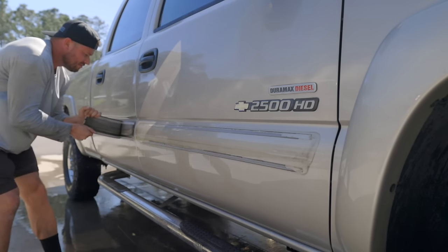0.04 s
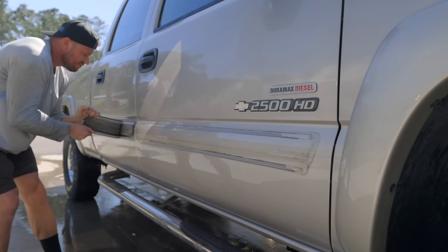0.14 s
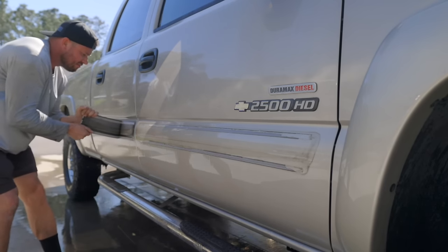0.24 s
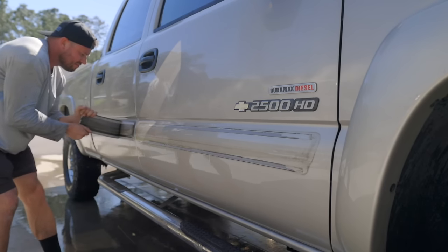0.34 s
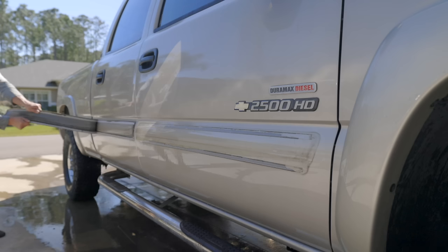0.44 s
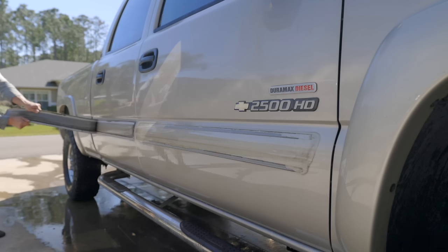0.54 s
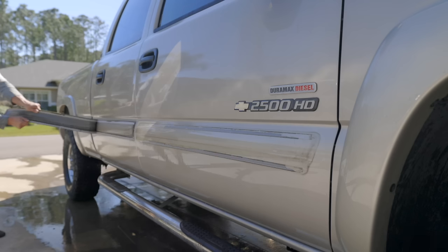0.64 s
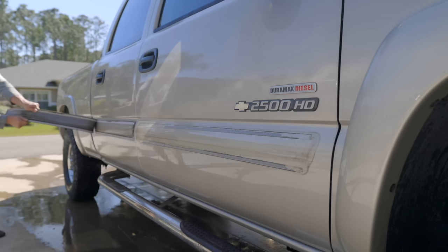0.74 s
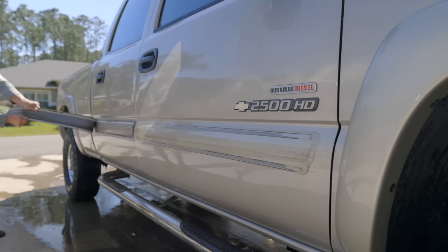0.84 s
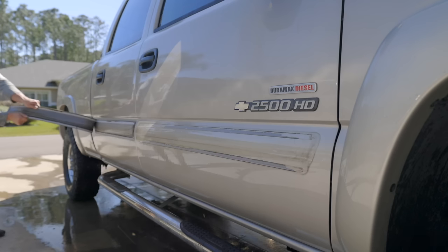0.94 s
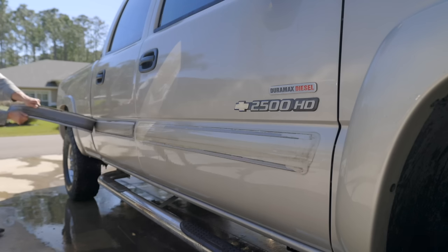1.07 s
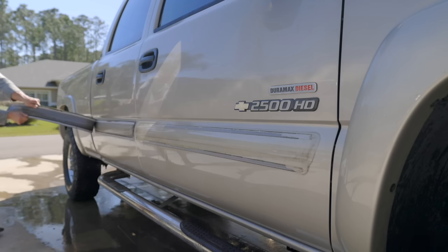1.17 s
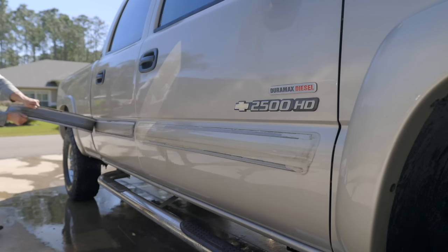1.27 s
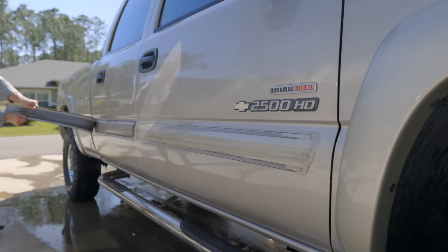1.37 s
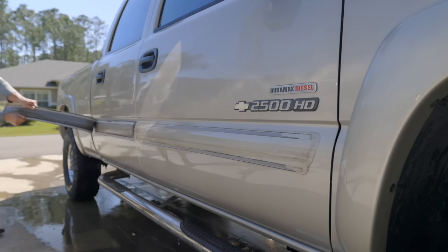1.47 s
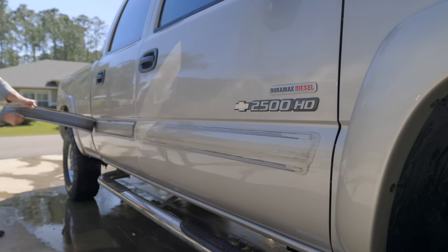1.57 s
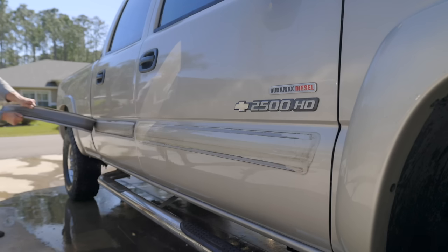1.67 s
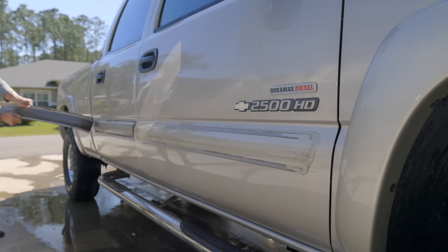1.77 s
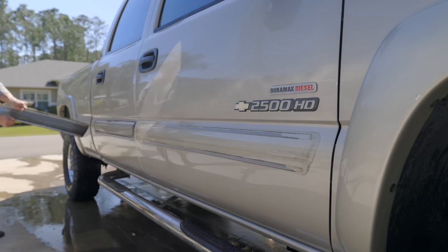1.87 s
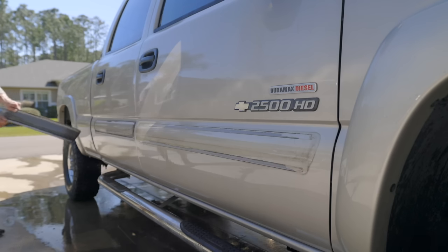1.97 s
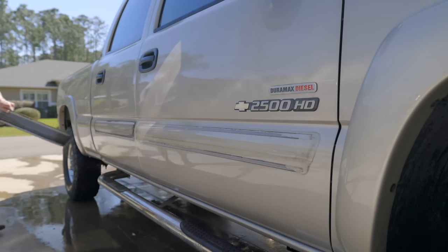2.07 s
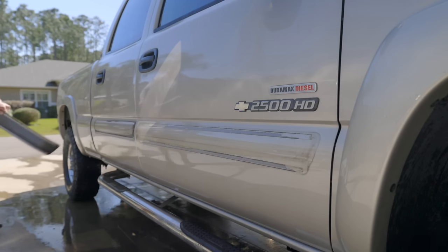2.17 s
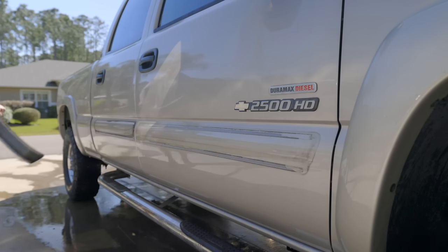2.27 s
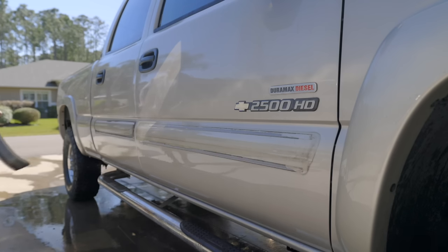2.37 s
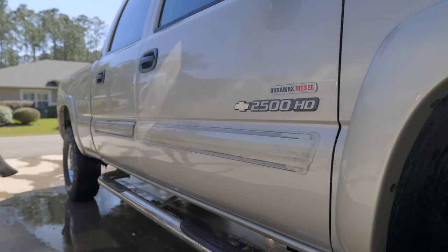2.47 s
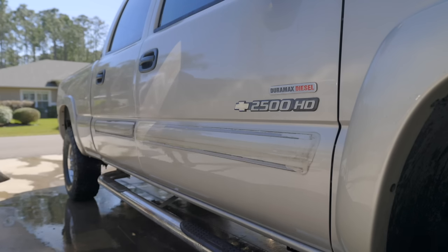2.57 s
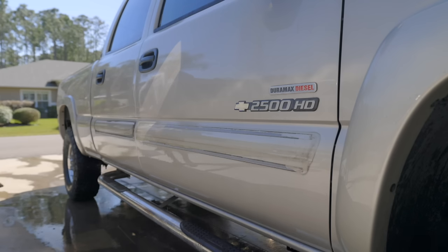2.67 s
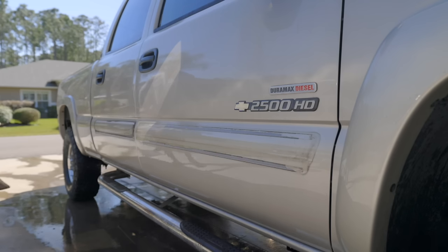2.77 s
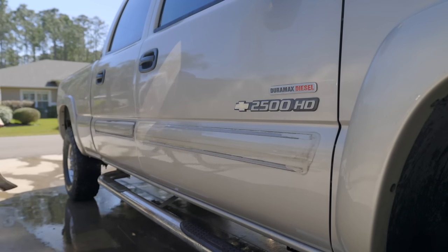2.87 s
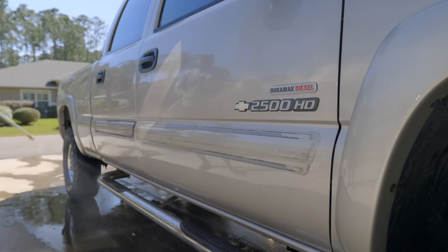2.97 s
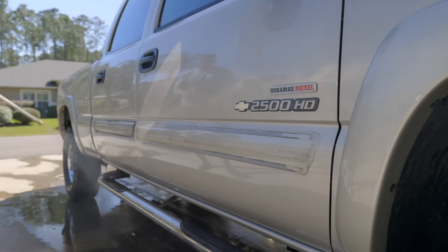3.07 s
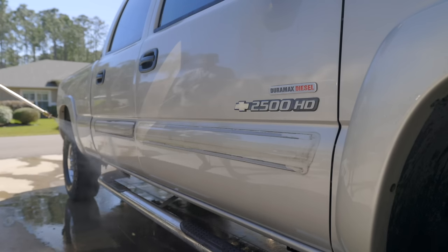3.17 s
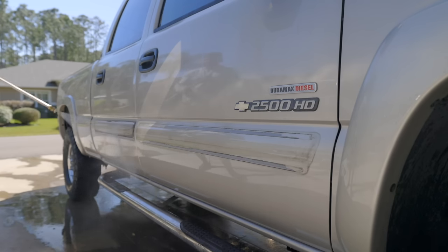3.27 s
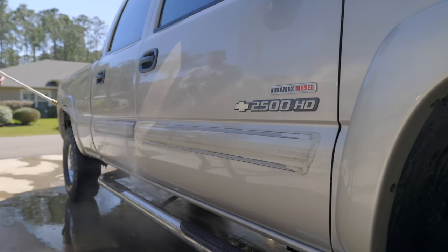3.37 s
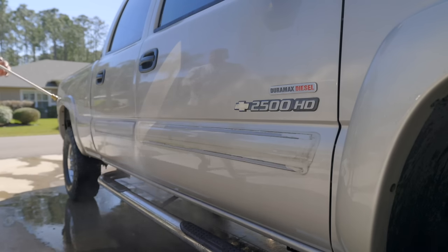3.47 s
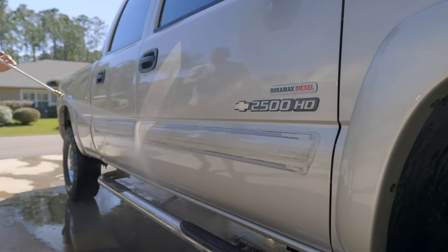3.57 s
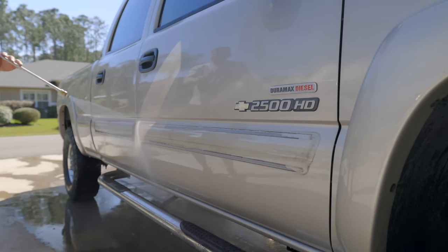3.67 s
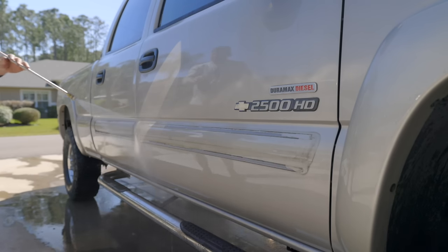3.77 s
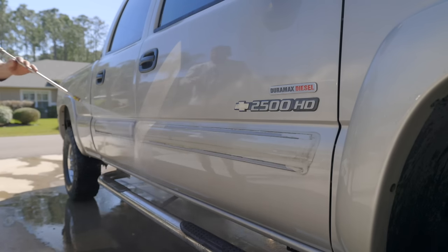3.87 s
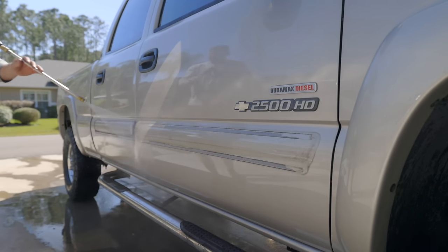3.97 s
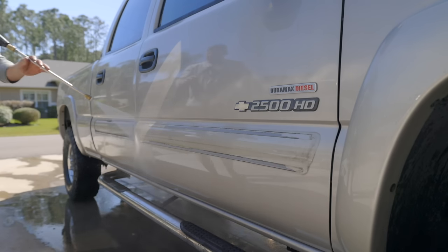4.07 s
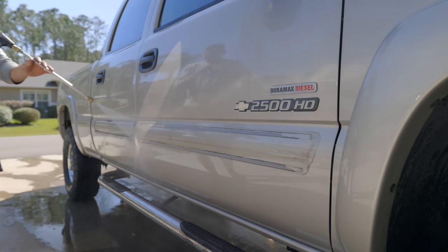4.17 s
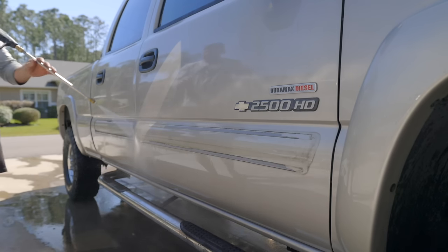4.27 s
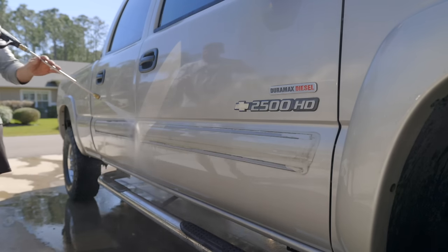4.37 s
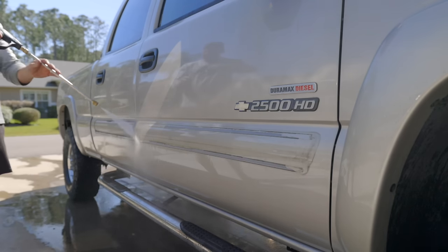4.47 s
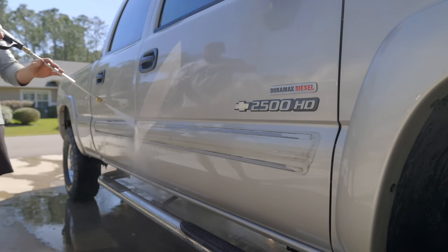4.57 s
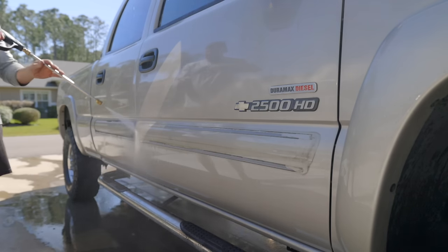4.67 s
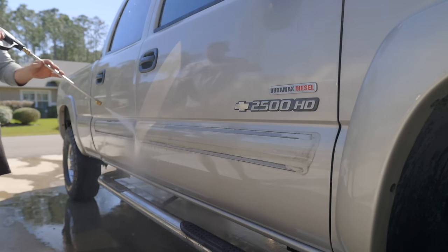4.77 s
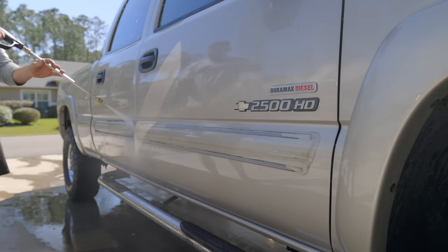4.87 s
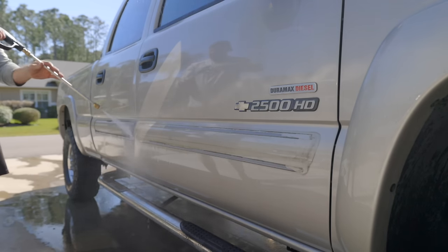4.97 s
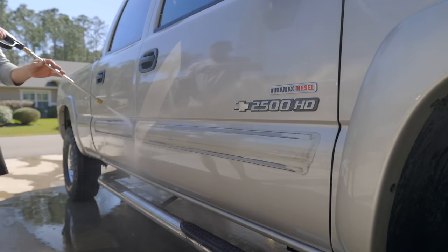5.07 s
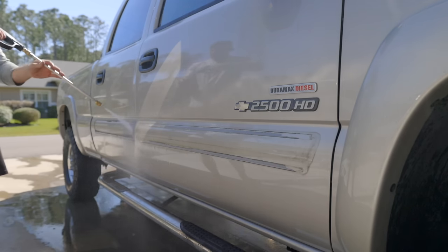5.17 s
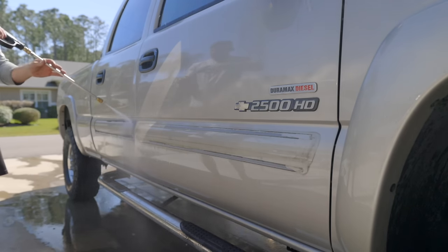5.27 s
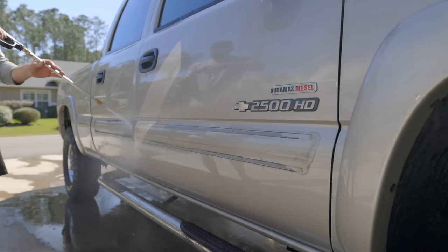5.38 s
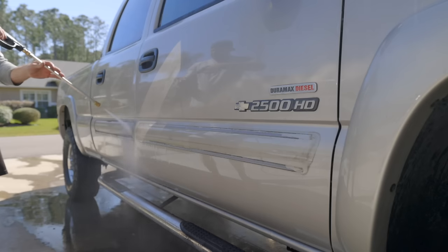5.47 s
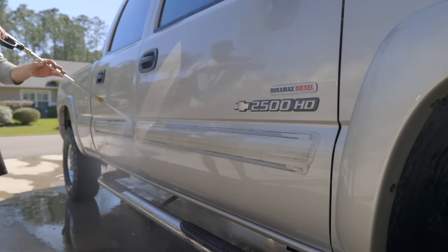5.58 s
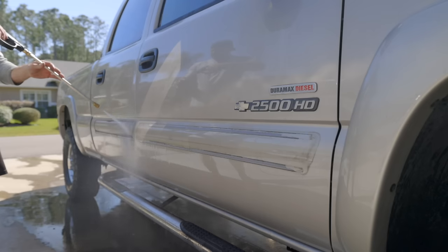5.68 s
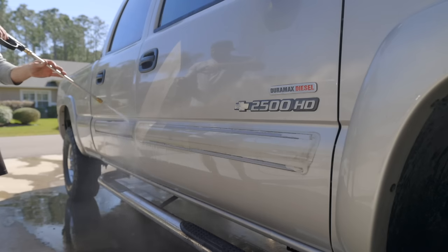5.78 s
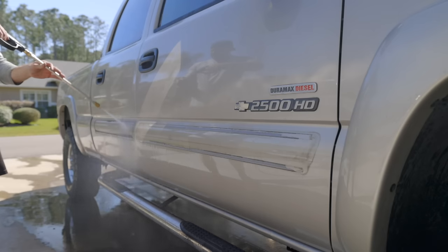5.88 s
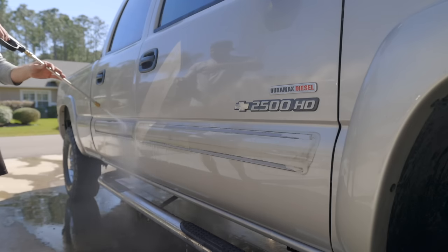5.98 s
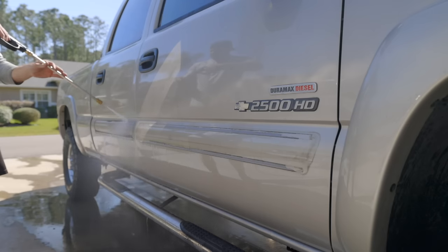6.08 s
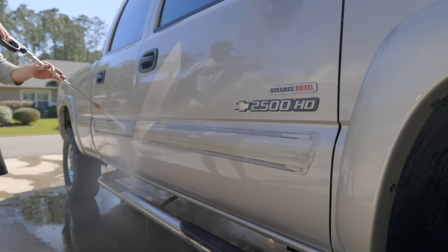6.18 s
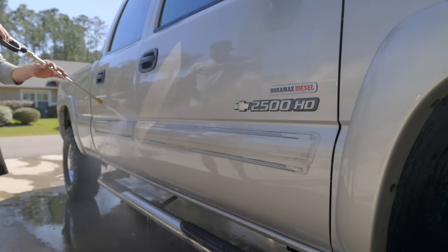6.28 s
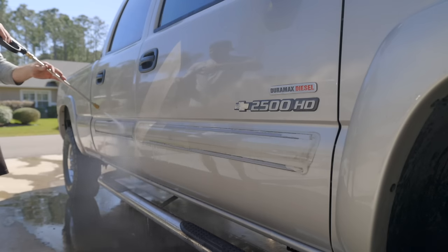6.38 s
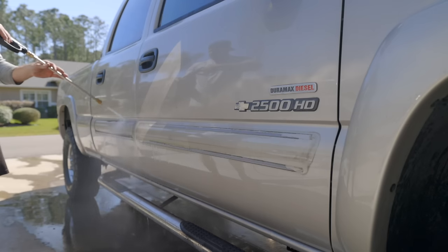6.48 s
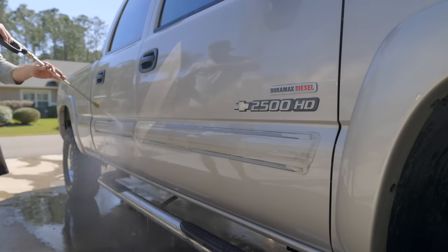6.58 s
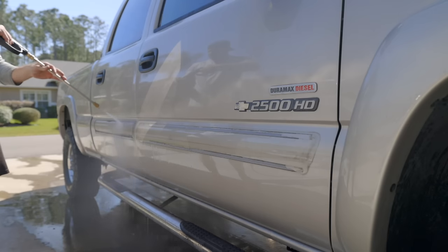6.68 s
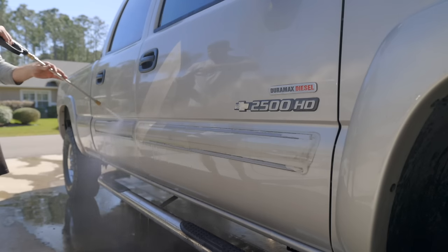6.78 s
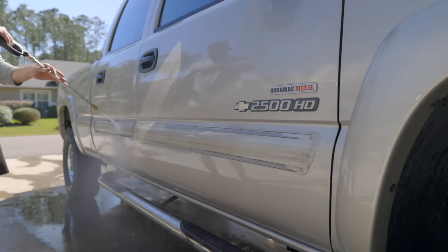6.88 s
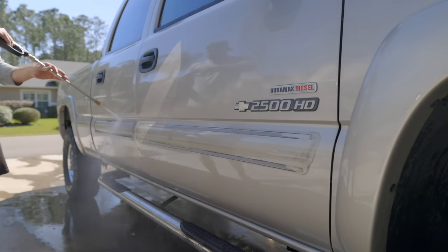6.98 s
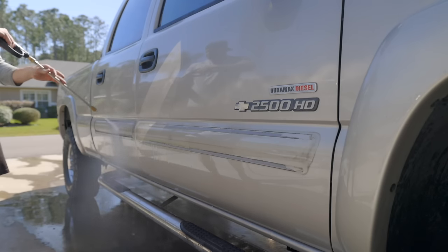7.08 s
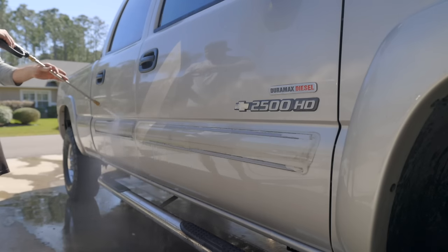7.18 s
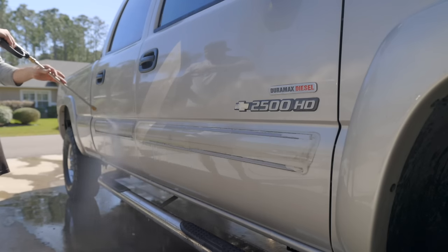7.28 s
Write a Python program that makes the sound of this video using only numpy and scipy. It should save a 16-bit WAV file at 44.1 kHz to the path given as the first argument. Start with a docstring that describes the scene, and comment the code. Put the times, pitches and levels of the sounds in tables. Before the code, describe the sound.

Outdoors on a quiet driveway, close to the microphone, a plastic trim strip clicks and creaks, then knocks sharply against a hollow truck door, with faint scraping between. After a brief near-silence a pressure washer opens abruptly with a sputtering hiss. The jet reaches the door, drums deeply on the sheet metal with quick pulsing splashes, then turns to a brighter, steady spray.

```python
"""Clips snap and plastic creaks over a faint hum: a trim strip is pried off a truck door on a driveway.
Shaped noise bursts make the snaps, decaying sines the ringing panel, random slips the creak and rubbing.
Then a pressure washer opens: filtered noise spits, clears and hisses, with an echo off the door.
The wand sweeps about four times a second, trading splash on the paint (random drops) against drumming
of the sheet metal, which fades as the jet turns to a glancing angle. One close microphone, open air."""
import sys
import numpy as np
from scipy import signal
from scipy.fft import rfft, irfft
from scipy.io import wavfile
from scipy.ndimage import uniform_filter1d, map_coordinates

SR = 44100
rng = np.random.default_rng(int(sys.argv[2]) if len(sys.argv) > 2 else 0)


def wav_out(sig):
    """Save sig, one row per channel (or a flat mono array), as 16-bit PCM at SR to the path in sys.argv[1]."""
    wavfile.write(sys.argv[1], SR, np.round(np.clip(np.atleast_2d(sig).T, -1, 1) * 32767).astype(np.int16))


N = 323023
TIME = np.arange(N) / SR
TRIGGER_S = 2.979
# bands in which each noise is scaled to rms 1 [Hz, Hz]
AIR_BAND, RUB_BAND, DRUM_BAND = (40, 2000), (3000, 12000), (250, 520)
HISS_BAND, SPLASH_BAND = (2800, 6000), (800, 2300)


def gain_of(db):
    """Decibels to an amplitude factor."""
    return 10 ** (np.asarray(db) / 20)


def evened(x):
    """Scales to rms 1."""
    return x / np.sqrt(np.mean(x ** 2) + 1e-20)


def read(points, hz):
    """Interpolates a spectrum table on a log-frequency axis."""
    point_hz, value = np.transpose(points)
    return np.interp(np.log(hz + 1), np.log(point_hz + 1), value)


def follow(rows, t=TIME):
    """Interpolates the columns of a time table at times t."""
    s, *columns = np.transpose(rows)
    return [np.interp(t, s, column) for column in columns]


def add(mix, start_s, sound):
    """Mixes a sound in at start_s."""
    part = mix[max(round(start_s * SR), 0):][:len(sound)]
    part += sound[:len(part)]


def coloured(x, colour, band):
    """Gives x a spectrum, with rms 1 inside the band."""
    hz = np.fft.rfftfreq(N, 1 / SR)
    spectrum = rfft(x) * gain_of(read(colour, hz))
    inside = (hz > band[0]) & (hz < band[1])
    return irfft(spectrum, N) * N / np.sqrt(2 * np.sum(abs(spectrum[inside]) ** 2))


def waver(rate_hz):
    """Smooth random curve of rms 1: noise low-passed at rate_hz."""
    hz = np.fft.rfftfreq(N, 1 / SR)
    return evened(irfft(rfft(rng.standard_normal(N)) / (1 + (hz / rate_hz) ** 4), N))


def impacts(per_s, spread_db):
    """Random train of small blows of either sign, a few of them large."""
    size = gain_of(spread_db * np.minimum(rng.exponential(1, N), 5))
    sign = rng.choice([-1, 1], N)
    return evened(size * sign * (rng.random(N) < per_s / SR))


def lowered(x, db, corner_hz):
    """Turns everything above a corner up or down along a curve."""
    low = signal.lfilter(*signal.butter(1, corner_hz, fs=SR), x)
    return low + gain_of(db) * (x - low)


# outdoor background spectrum: hz [Hz], density_db [dB per Hz]
AIR_COLOUR = [(15, -63), (25, -25), (106, -5), (158, -2.5), (191, -9), (264, -9.5), (373, -17.5),
              (404, -17.5), (709, -19.5), (1540, -24.5), (3010, -36.5), (3350, -42), (10600, -52.5),
              (15000, -50.5)]
AIR_DB = -49  # in AIR_BAND, before the treble gain
HUM_HZ, HUM_DB = 158.2, -65.5
# treble gain of the background steps up early on
HUSH_OPENS_S, HUSH_BEFORE_DB, HUSH_AFTER_DB = .455, 1, 4


def outdoors(swell_db=0.0289, hum_drift=0.011):
    """Low neighbourhood noise plus a far-off motor hum, a sine wavering in pitch and level."""
    air = coloured(rng.standard_normal(N), AIR_COLOUR, AIR_BAND)
    air = air * gain_of(AIR_DB + swell_db * waver(2.2))
    treble_db = np.where(TIME < HUSH_OPENS_S, HUSH_BEFORE_DB, HUSH_AFTER_DB)
    hum_hz = HUM_HZ * (1 + hum_drift * waver(11))
    hum = evened(np.sin(2 * np.pi * np.cumsum(hum_hz) / SR))
    return lowered(air, treble_db, corner_hz=400.1) + gain_of(HUM_DB + 2.5 * waver(4)) * hum


# door panel modes: mode_hz [Hz], level_db [dB], t60_s [s]
DOOR_MODES = [(169.76, -13.5, 0.43), (213.27, -9.5, 0.26), (276.27, -6, 0.4), (301.95, 2.5, 0.3114),
              (365.95, 0.5, 0.38194), (445.66, -7, 0.17), (527, -7.5, 0.25), (645.34, -18, 0.22),
              (1042.7, -17, 0.35), (1150.1, -11.5, 0.22), (1428.9, -8.5, 0.1689), (1536.5, -21.5, 0.16),
              (2015.9, -16, .14), (3114.4, -20, 0.13)]


def door_ring(radiates_hz=130):
    """The panel's answer to one blow: decaying modes; it radiates little below its lowest mode."""
    t = np.arange(SR // 2) / SR
    ring = np.zeros(len(t))
    for mode_hz, level_db, t60_s in DOOR_MODES:
        ring += gain_of(level_db) * np.exp(-np.log(1000) * t / t60_s) * np.sin(2 * np.pi * mode_hz * t)
    return signal.lfilter(*signal.butter(2, radiates_hz, "high", fs=SR), ring)


# base decay of the dense ringing of strip and door: hz [Hz], t60_s [s]
RING_DECAY = [(100, 0.087), (350, 0.343), (1000, 0.21627), (3000, 0.16965), (7000, 0.12266), (14000, 0.16)]


def snap(level_db, low_hz, high_hz, decay, crack, crack_s=0.000707, spill_db=-24, edge_db=-24, edge_hz=13000):
    """A crack and its dense ringing; a stiff clip is bright, a blunt knock dull, the crack keeps an edge."""
    t = np.arange(SR // 2) / SR
    hz, frame_s, z = signal.stft(rng.standard_normal(len(t)), SR, nperseg=256)
    t60_s = decay * read(RING_DECAY, hz)[:, None]
    ring = signal.istft(z * np.exp(-np.log(1000) * frame_s / t60_s), SR, nperseg=256)[1][:len(t)]
    burst = crack * ring * np.exp(-(t / crack_s) ** 2)
    top = signal.butter(2, min(high_hz, SR / 2 - 1), fs=SR)
    foot = signal.butter(2, low_hz, "high", fs=SR)
    # spill past the upper edge
    bright = gain_of(spill_db) * np.sqrt(high_hz / SR) * ring + gain_of(edge_db) * burst
    bright = signal.lfilter(*signal.butter(2, min(edge_hz, SR / 2 - 1), fs=SR), bright)
    sound = signal.lfilter(*foot, signal.lfilter(*top, ring + burst) - bright)
    return gain_of(level_db) * sound / np.sqrt(np.mean(sound[:SR // 100] ** 2))  # level over first 10 ms


def friction(slips_per_s, slip_db, ring_s=0.0026):
    """Tiny random slips, each a brief decaying burst of noise."""
    decay = np.exp(-1 / (ring_s * SR))
    energy = signal.lfilter([1], [1, -decay], impacts(slips_per_s, slip_db) ** 2)
    return np.sqrt(energy) * rng.standard_normal(N)


def stroke(peak_s, level_db, swell_s, fade_s):
    """Gain of one rub: it swells to a rounded peak and fades."""
    away = np.maximum((peak_s - TIME) / swell_s, (TIME - peak_s) / fade_s)
    return gain_of(level_db - 20 * away ** 2)


# clips snapping, strip knocking: start_s [s], level_db [dB], low_hz [Hz], high_hz [Hz],
# decay [factor on t60], crack [factor over ringing], push_db [dB, gain of the panel's answer]
CLIP_SNAPS = [(.0025, -18.8, 3900, 6000, 0.2753, 2, -58), (.003, -22, 278, 440, 0.34, 2.5, -39),
              (.782, -22, 299.8, 1885, 0.372, -0.5, -28), (0.786, -13.3, 250, 830.5, 0.819, 2, -21),
              (0.8488, -24.5, 1900, 2700, 0.5415, 0.5, -42.5), (0.854, -28, 2103, 3399, 1.0265, 8, -37.5),
              (1.1997, -35, 450, 5188, 1.1675, -0.5, -55.5), (1.8323, -15.7, 239.5, 3157, 0.996, 2, -17.3),
              (1.8388, -18, 1100, 2800, 0.529, 1, -35), (1.866, -36, 3195, 3576, 0.538, -0.5, -40),
              (1.9021, -40, 2988, 3588, 1.031, 0.5, -58.5)]
# strip rubbing along the door: peak_s [s], level_db [dB], swell_s [s per 20 dB], fade_s [s per 20 dB]
RUB_STROKES = [(.55, -62, .2, .3), (.78, -51.5, .2, .2), (1.067, -46, .042, .044), (1.82, -57.5, .3, .2),
               (2.23, -60, .12, .5), (2.48, -58, .3, .65)]
# rubbing spectrum: hz [Hz], density_db [dB per Hz]
RUB_SPECTRUM = [(600, 10), (1800, 9.5), (3300, 7), (4500, 4), (6500, 0.5), (8800, 0), (12000, -6.5),
                (16000, -23.5)]
# panel murmur below, plastic creak above: hz [Hz], density_db [dB per Hz]
CREAK_SPECTRUM = [(90, -20.5), (290, 7.5), (420, 1), (800, -6.5), (1900, -25), (2800, -22.5), (3300, -9.5),
                  (4400, -15), (6200, -20), (7800, -18.5), (11000, -26), (16000, -29.5)]
# creak and murmur fade slowly, then stop abruptly
CREAK_DB, CREAK_FADE_DB_PER_S, CREAK_END_S, CREAK_STOP_DB_PER_S = -45, 19.5, 0.45524, 301.5


def trim_strip(handling_db=-75):
    """Clips let go and kick the panel; slips of plastic make the creak and the rubbing."""
    snaps, panel = np.zeros(N), door_ring()
    for start_s, level_db, low_hz, high_hz, decay, crack, push_db in CLIP_SNAPS:
        add(snaps, start_s, snap(level_db, low_hz, high_hz, decay, crack) + gain_of(push_db) * panel)
    stroke_power = sum(stroke(*row) ** 2 for row in RUB_STROKES)
    rub_gain = np.sqrt(stroke_power + gain_of(handling_db) ** 2 * (TIME < TRIGGER_S))
    rub = coloured(friction(slips_per_s=1500, slip_db=1.5), RUB_SPECTRUM, RUB_BAND) * rub_gain
    stop_db = CREAK_STOP_DB_PER_S * np.maximum(TIME - CREAK_END_S, 0)
    creak_db = CREAK_DB - CREAK_FADE_DB_PER_S * TIME - stop_db
    creak = coloured(friction(slips_per_s=820, slip_db=3.0), CREAK_SPECTRUM, DRUM_BAND) * gain_of(creak_db)
    return snaps + rub + creak


SWEEP_S, SWEEP_PEAK_S, SWEEP_START_S, SWEEP_BUILD_S = .235, 6.843, 4.05, .12  # cycle, a peak, onset, build
# swing per layer; drumming falls while the splash rises
SWEEP_HISS_DB, SWEEP_SPLASH_DB, SWEEP_DRUM_DB = .5, 2.1, 1.5


def sweep(crest=1.3):
    """Swing of the wand, about -1 to 1: it lingers at one end and flicks through the other."""
    swing = (.5 + .5 * np.cos(2 * np.pi * (TIME - SWEEP_PEAK_S) / SWEEP_S)) ** crest
    return np.clip((TIME - SWEEP_START_S) / SWEEP_BUILD_S, 0, 1) * 2 * (swing - swing.mean())


TURN_START_S, TURN_S = 4.6476, 1.1717


def glancing(t):
    """Angle of the jet on the door: 0 square, 1 glancing."""
    return np.clip((t - TURN_START_S) / TURN_S, 0, 1)


SPURT_S, CLEAR_S = .11, .1  # dullest moment after the trigger, time scale of clearing
SPURT_TILT_DB_PER_OCT, SQUARE_TILT_DB_PER_OCT, GLANCING_TILT_DB_PER_OCT = -12, -1.0925, -0.1765


def mist_tilt(t):
    """Brightness of the mist in dB per octave: dull while a pocket of air leaves the line."""
    air = 1 / np.cosh((t - TRIGGER_S - SPURT_S) / CLEAR_S)
    turn_db_per_oct = (GLANCING_TILT_DB_PER_OCT - SQUARE_TILT_DB_PER_OCT) * glancing(t)
    return SPURT_TILT_DB_PER_OCT * air + SQUARE_TILT_DB_PER_OCT + turn_db_per_oct


def patches(shape, depth_db):
    """Random mottling of the spray's colour: dB over (bins, frames)."""
    field = uniform_filter1d(rng.standard_normal(shape), size=4, axis=0)
    field = uniform_filter1d(field, size=45, axis=1)
    return depth_db * evened(field)


# jet brought onto the door and turned; slow levels before each layer's trim and modulation:
# start_s [s], hiss_db [dB], splash_db [dB], drum_db [dB]
JET_COURSE = [(3.0, -35, -35, -56), (3.4, -31.5, -36, -44.5), (3.52, -30.5, -32.5, -27),
              (3.75, -31, -31, -25.5), (3.92, -30, -28, -17.5), (4.22, -30.3, -24, -16),
              (4.68, -30.5, -19.5, -17.5), (5.12, -28.5, -27, -16.5), (5.45, -26.5, -25.5, -24),
              (6.35, -27, -24.9, -35), (7.32, -27, -24, -36.5)]
# hiss spectrum before mist: hz [Hz], density_db [dB per Hz]
HISS_COLOUR = [(45, -24.5), (130, -8.5), (260, -9.5), (700, -10), (1400, -5.5), (2200, -1), (2750, -1),
               (3450, 3.3), (4500, -3.5), (6400, 1), (8100, 2.5), (10000, -3.5), (12500, -5), (14300, -8.5),
               (16000, -14)]
# hiss by way of the door: lag shrinks, echo factor grows as the wand settles
WAND_SETTLE_S = 0.4358
LAG_FAR_MS, LAG_NEAR_MS, ECHO_FAR, ECHO_NEAR = 0.71685, 0.61704, 0.0514, 0.19875
# narrow hollow in the hiss comes and goes while the wand is brought in
HOLLOW_HZ, HOLLOW_DB, HOLLOW_AT_S, HOLLOW_SPREAD_S = 6956.3, -5.5, 3.744, 0.6545
# air dragged along by the jet: level at the hardest drumming, share of the drum's dB changes followed
DRAUGHT_DB, DRAUGHT_SHARE = -44, 0.3119


def nozzle(trim_db=-1.2892, mist_hz=4500, flutter_db=.5, hollow_width_hz=330):
    """The jet tears into mist, which tilts the hiss; the door mirrors it into a slowly sliding comb."""
    hiss_db, _, drum_db = follow(JET_COURSE)
    noise = coloured(rng.standard_normal(N), HISS_COLOUR, HISS_BAND)
    hz, t, z = signal.stft(noise, SR, nperseg=512)
    mist_db = np.log2(np.maximum(hz / mist_hz, 1))[:, None] * mist_tilt(t)
    off_time = (t - HOLLOW_AT_S) / HOLLOW_SPREAD_S
    off_pitch = (hz[:, None] - HOLLOW_HZ) / hollow_width_hz
    hollow_db = HOLLOW_DB * np.exp(-off_time ** 2 - off_pitch ** 2)
    colour_db = mist_db + hollow_db + patches(z.shape, depth_db=1.21)
    hiss = signal.istft(z * gain_of(colour_db), SR, nperseg=512)[1][:N]
    far = np.exp(-np.maximum(TIME - TRIGGER_S, 0) / WAND_SETTLE_S)
    lag_ms = LAG_NEAR_MS + (LAG_FAR_MS - LAG_NEAR_MS) * far
    echo = ECHO_NEAR + (ECHO_FAR - ECHO_NEAR) * far
    mirrored = map_coordinates(hiss, [np.arange(N) - lag_ms * SR / 1000], order=3)
    hiss_gain = gain_of(hiss_db + trim_db + SWEEP_HISS_DB * sweep() + flutter_db * waver(61.1))
    draught_colour = [(30, -28), (60, -6), (100, -3.0), (210, 3), (400, -12.5), (1500, -46)]  # Hz, dB per Hz
    draught = coloured(rng.standard_normal(N), draught_colour, AIR_BAND)
    draught_gain = gain_of(DRAUGHT_DB + DRAUGHT_SHARE * (drum_db - drum_db.max()))
    return (hiss + echo * mirrored) * hiss_gain + draught * draught_gain


# splash on paint: hz [Hz], density_db [dB per Hz]
SPLASH_SPECTRUM = [(100, -27.5), (350, -6), (540, 1.5), (850, -2), (1300, .5), (2250, -.5), (2700, -9.5),
                   (4500, -15.5), (9000, -29.5)]
# sheet metal drumming: hz [Hz], density_db [dB per Hz]
DRUM_SPECTRUM = [(50, -49.5), (130, -26.5), (185, -21.5), (215, -11), (238, -17.5), (280, -2), (345, 1.5),
                 (400, 0.5), (460, -6), (550, -10.5), (640, -16.5), (1000, -24.5), (3000, -36)]
SQUARE_HZ, GLANCING_HZ = 1267.3, 2185.2  # splash centre before and after the turn


def water_on_door(trim_db=-1.3541, ring_db=-18, drops_per_s=9000, drop_db=1.0, drum_surge_db=0.7691,
                  centre_db=3.5, centre_octaves=0.3721, thin_hz=1050, thinness=0.915):
    """Drops pelt the paint and shake the metal by turns; the drumming surges as the jet breaks up."""
    _, splash_db, drum_db = follow(JET_COURSE)
    drops = coloured(impacts(drops_per_s, drop_db), SPLASH_SPECTRUM, SPLASH_BAND)
    hz, t, z = signal.stft(drops, SR, nperseg=512)
    # splash rises in pitch as the jet turns
    centre_hz = SQUARE_HZ + (GLANCING_HZ - SQUARE_HZ) * glancing(t)
    bell = np.exp(-(np.log2((hz[:, None] + 1) / centre_hz) / centre_octaves) ** 2)
    # first spurt, still mixed with air, has little body
    thin_db = thinness * np.minimum(mist_tilt(t), 0) / (1 + (hz[:, None] / thin_hz) ** 10)
    splash = signal.istft(z * gain_of(centre_db * (bell - .5) + thin_db), SR, nperseg=512)[1][:N]
    drum = coloured(rng.standard_normal(N), DRUM_SPECTRUM, DRUM_BAND)
    drum = drum + gain_of(ring_db) * evened(signal.oaconvolve(drum, door_ring())[:N])
    splash_gain = gain_of(splash_db + trim_db + SWEEP_SPLASH_DB * sweep())
    drum_gain = gain_of(drum_db - SWEEP_DRUM_DB * sweep() + drum_surge_db * waver(43.4))
    return splash * splash_gain + drum * drum_gain


def scene():
    """The trigger opens within milliseconds; everything is heard from one point."""
    valve = np.clip((TIME - TRIGGER_S) / .004, 0, 1)
    mono = outdoors() + trim_strip() + valve * (nozzle() + water_on_door())
    return np.array([mono, mono])


def record(dry, low_cut_hz=46, peak=.86, edge_hz=15850):
    """The microphone drops the deepest bass and flattens the hardest peaks; then the band limit."""
    thinned = signal.sosfilt(signal.butter(5, low_cut_hz, "high", fs=SR, output="sos"), dry)
    held = np.clip(thinned, -peak, peak)
    band_limit = signal.firwin(511, edge_hz, window=("kaiser", 9), fs=SR)
    return signal.oaconvolve(held, band_limit[None], "same")


dry = scene()
out = record(dry)
wav_out(out)
```